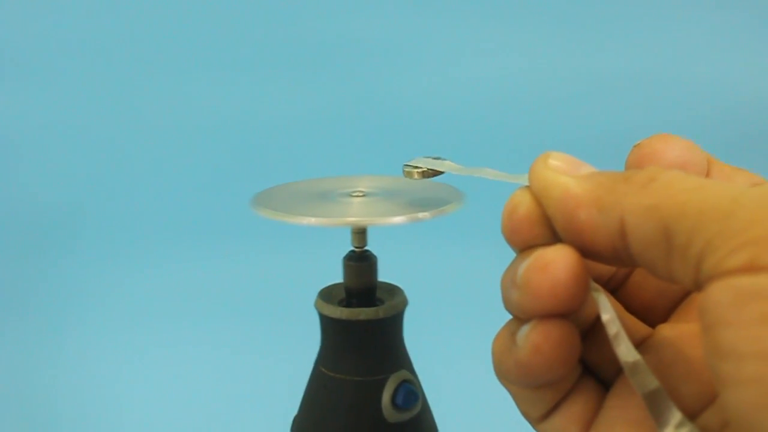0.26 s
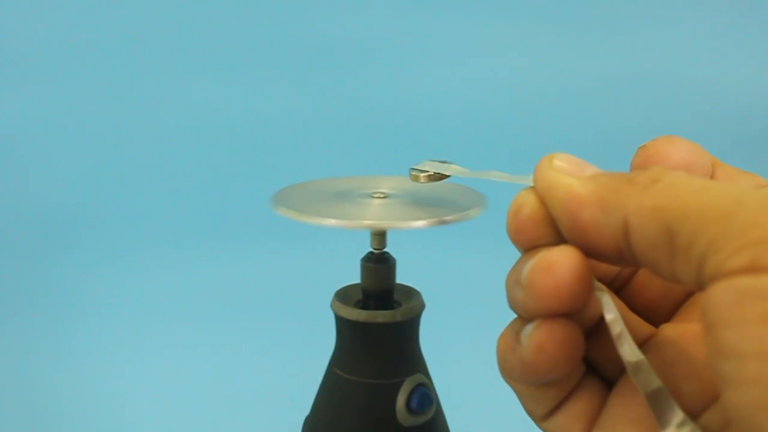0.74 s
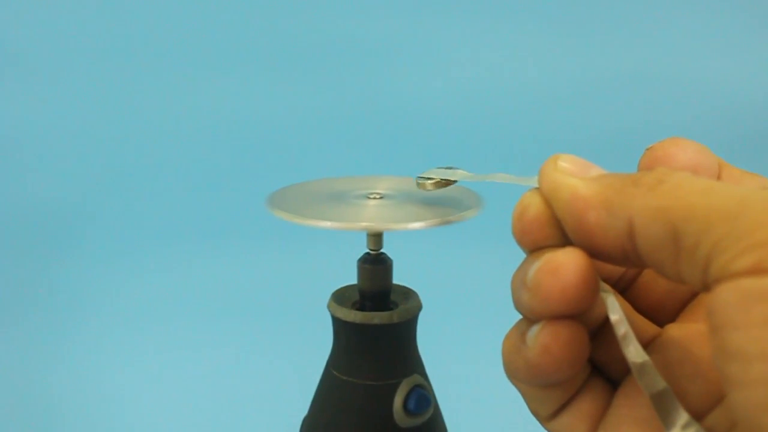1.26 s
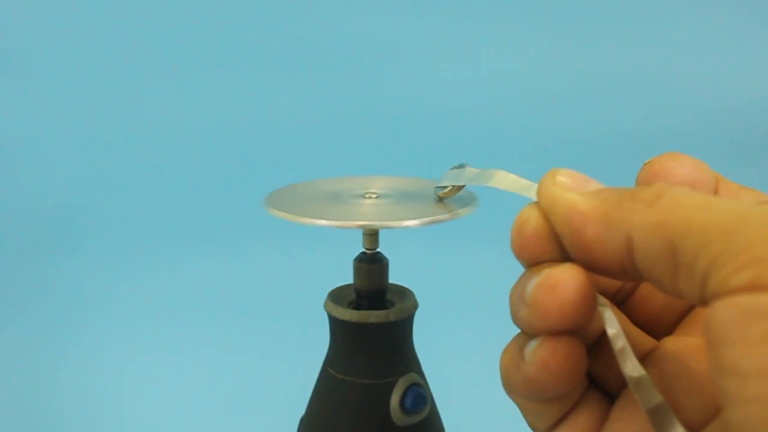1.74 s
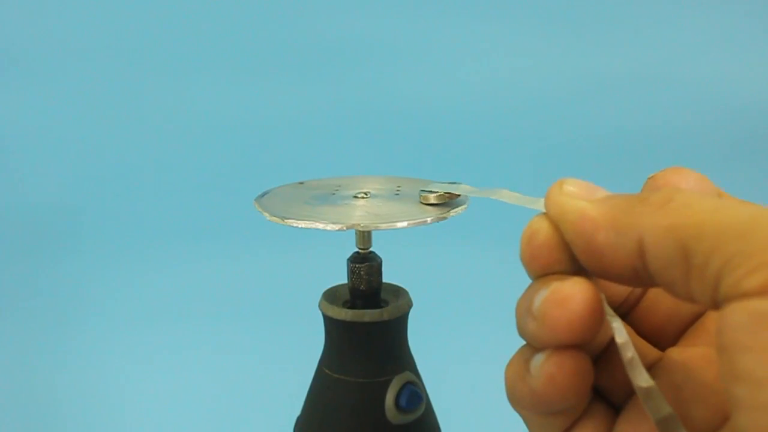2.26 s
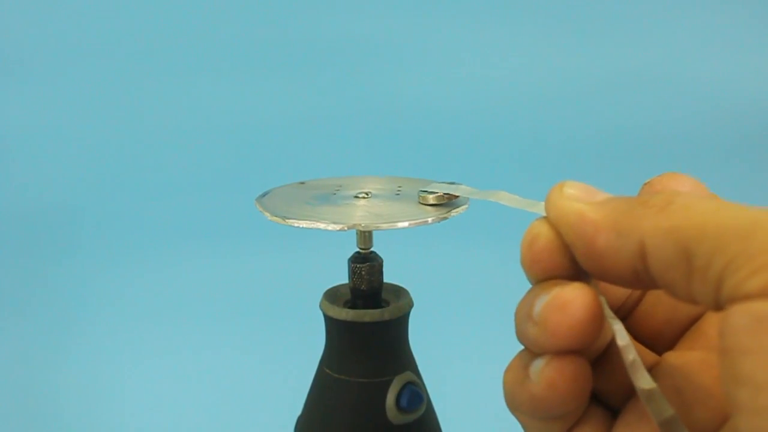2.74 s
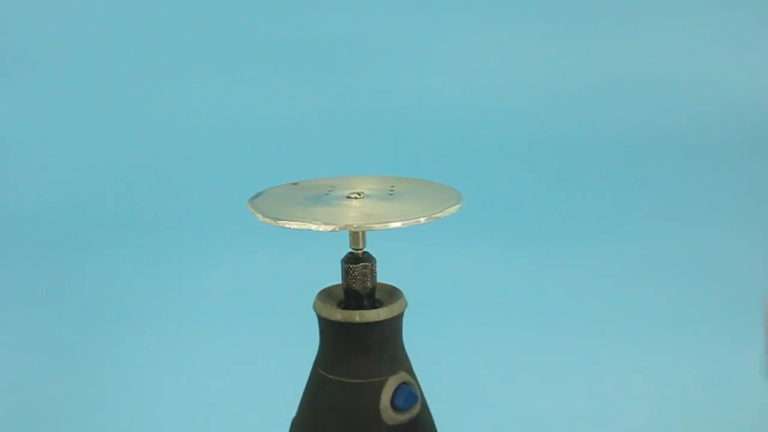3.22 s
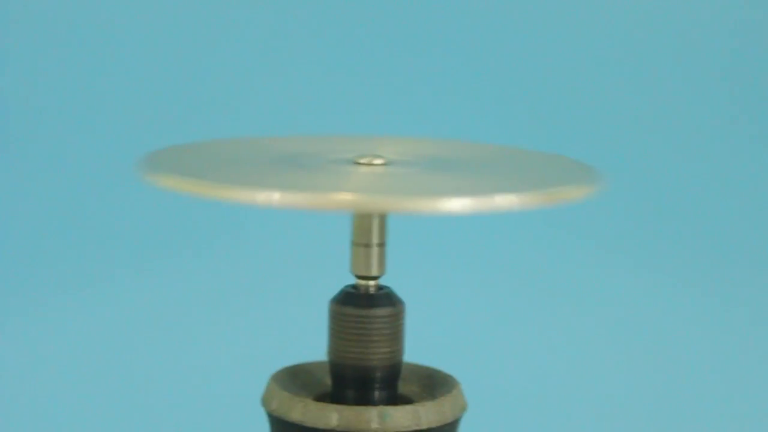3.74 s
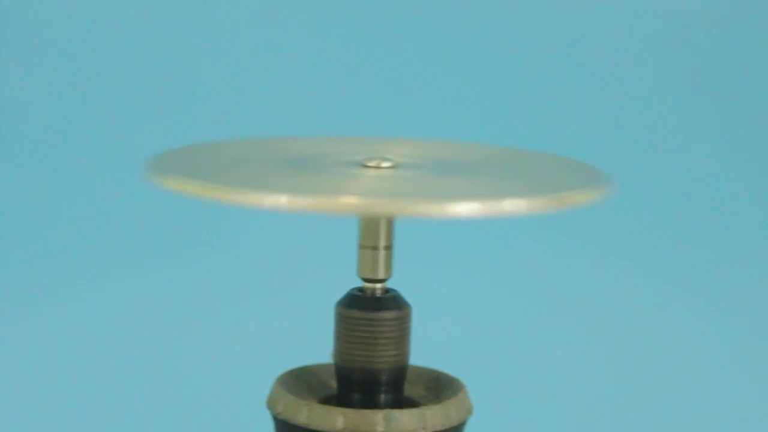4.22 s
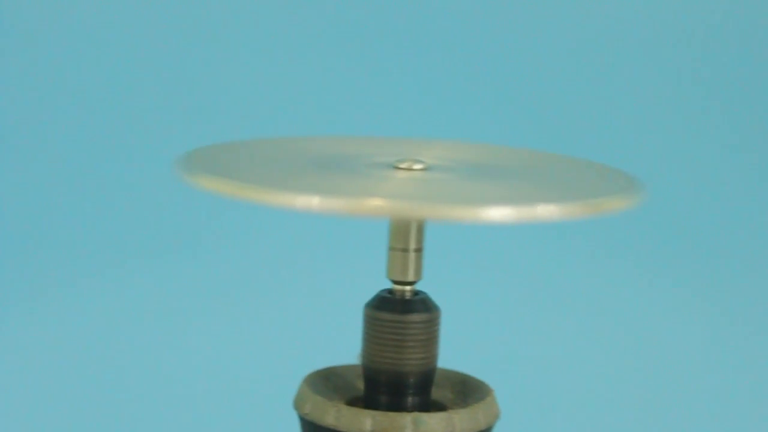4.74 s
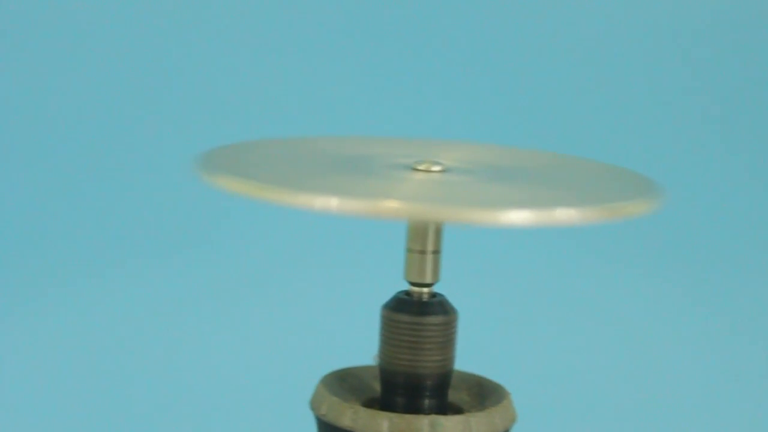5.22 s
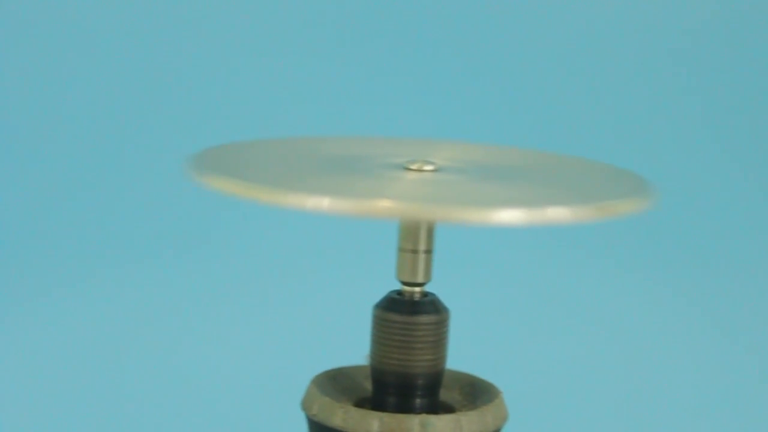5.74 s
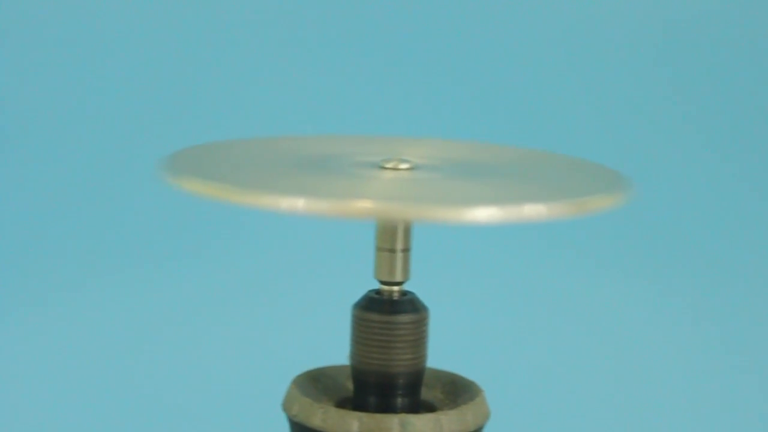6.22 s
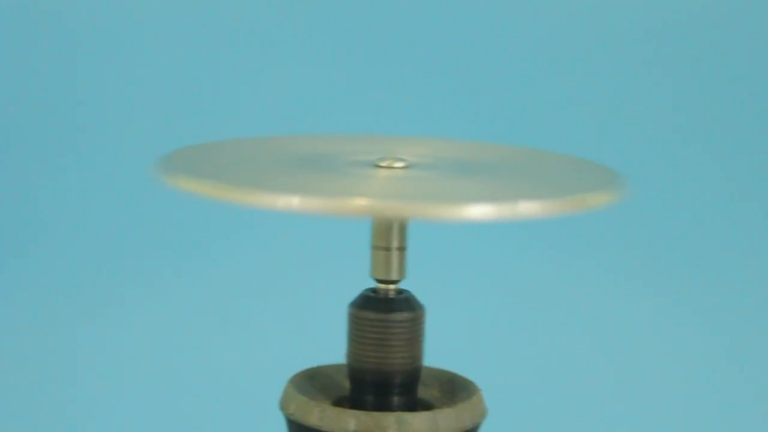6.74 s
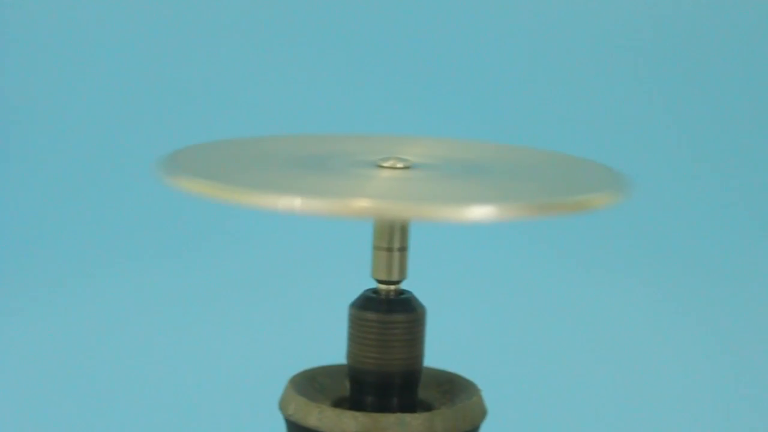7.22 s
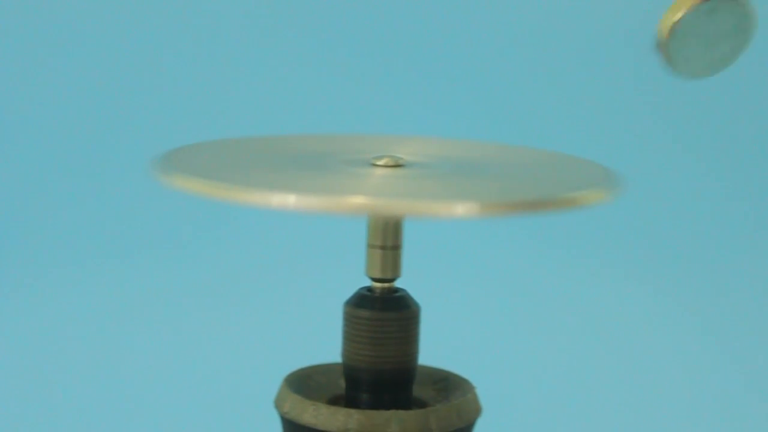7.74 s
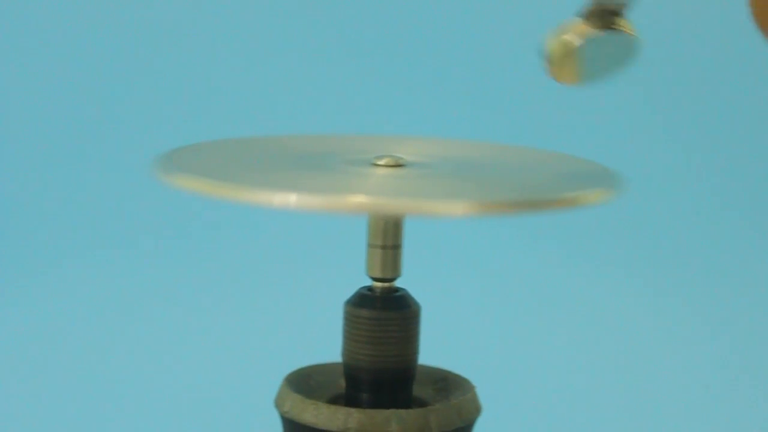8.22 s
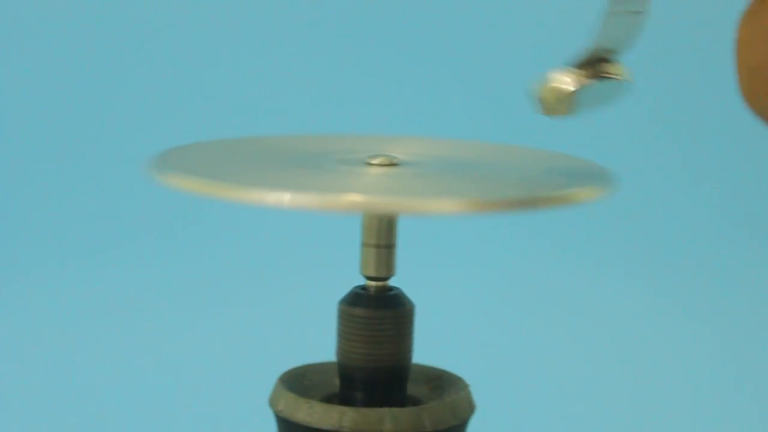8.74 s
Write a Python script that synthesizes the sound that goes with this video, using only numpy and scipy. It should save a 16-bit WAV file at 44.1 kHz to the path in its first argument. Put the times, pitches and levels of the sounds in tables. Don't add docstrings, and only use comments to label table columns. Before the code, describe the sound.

Close up in a quiet room, a small electric rotary tool hums and hisses, is switched off and glides down in pitch. A magnet clacks on the metal disc, skids and bounces with short ringing, then rests. After faint room hum it is pulled off with a light scrape. An abrupt cut brings back the motor, droning steadily to the end.

```python
import sys
import numpy as np
from scipy import signal
from scipy.fft import rfft, irfft
from scipy.io import wavfile
from scipy.ndimage import uniform_filter1d, map_coordinates

SR = 44100
rng = np.random.default_rng(int(sys.argv[2]) if len(sys.argv) > 2 else 0)


def log_audio(samples):
    frames = np.atleast_2d(samples).T
    limited = np.clip(frames, -1, 1)
    pcm = np.round(limited * 32767).astype(np.int16)
    wavfile.write(sys.argv[1], SR, pcm)


def amplitude_ratio(level_db):
    exponent = np.asarray(level_db, float) / 20
    return 10 ** exponent


N = 395577
T = np.arange(N) / SR
OFF_S, STOP_S, CHANGE_S = .52, 1.5, 3.4815
FIRST, SECOND = T < STOP_S, T > CHANGE_S
RIPPLE_HZ = 120
RUN_HZ = 186.2


def curve(table, outside=-120.):
    s, *columns = np.transpose(table)
    return [np.interp(T, s, c, left=outside, right=outside) for c in columns]


def unit(x):
    return x / np.sqrt(np.mean(x ** 2))


def colour(x, points, lo_hz=0.74, hi_hz=SR / 2):
    f = np.arange(1, N // 2 + 2) * SR / N
    hz, db = np.transpose(points)
    edges = 1 / np.sqrt((1 + (lo_hz / f) ** 8) * (1 + (f / hi_hz) ** 8))
    shape = amplitude_ratio(np.interp(np.log(f), np.log(hz), db))
    return unit(irfft(rfft(x) * shape * edges, N))


def walk(rate):
    knots = rng.standard_normal(400)
    return np.interp(T * rate, np.arange(len(knots)), knots)


def swell(s, length, rise_db_s, fall_db_s):
    return amplitude_ratio(-rise_db_s * np.maximum(s - T, 0) - fall_db_s * np.maximum(T - s - length, 0))


def whistle(s, length, hz, db):
    phase = np.cumsum(hz * (1 + 0.00404 * walk(30))) / SR
    gain = swell(s, length, 250, 400) * amplitude_ratio(db + 2.5 * walk(35))
    return np.sqrt(2) * gain * np.sin(2 * np.pi * phase)


def body(hz, modes):
    return np.sqrt(1 + sum(amplitude_ratio(2 * db) / (1 + (2 * (hz - f) / width) ** 2) for f, width, db in modes))


def peaks(hz, modes):
    return np.sqrt(sum(amplitude_ratio(2 * db) / (1 + (2 * (hz - f) / width) ** 2) ** 2 for f, width, db in modes))


def walls(hz, spread_db):
    return amplitude_ratio(spread_db * np.interp(hz / 45, np.arange(500), rng.standard_normal(500)))


# (frequency [Hz], level [dB per Hz])
ROOM_TONE = [(76, -24), (130, -13.5), (234, -21.5), (311, -9.5), (351, -15), (388, -22), (421, -15),
             (559, -19), (1210, -20), (1310, -21), (11900, -49), (16500, -72)]
# (time [s], length [s], frequency [Hz], level [dB])
FAR_WHISTLES = [(2.68, .13, 6960, -64), (2.84, .05, 6977, -63), (3.25, .23, 6960, -57),
                (2.58, .13, 9850, -66), (3.1, .38, 8600, -68)]


def room():
    hum = amplitude_ratio(-50 + 1.0 * walk(6.14)) * colour(rng.standard_normal(N), ROOM_TONE)
    return hum + sum(whistle(*row) for row in FAR_WHISTLES)


# (time [s], length [s], deep level [dB], upper level [dB])
TABLE_SHUDDERS = [
    (0, .05, -62, -60),
    (1.494, .02, -62, -51),
    (2.503, 0.83, -59.5, -64.5),
    (3.49, 0.46, -64, -50.5),
    (4.25, .2, -57, -49),
    (7.153, 0.57, -58, -45),
    (8.12, 0.071, -50, -52),
    (8.4, .57, -66, -66),
]


def table():
    deep = colour(rng.standard_normal(N), [(30, -25), (45, 7.0), (55, 8), (65, -11), (100, -29.5)])
    upper = colour(rng.standard_normal(N), [(50, -30), (75, 9), (90, -6), (106, 10.5), (125, -13), (200, -30)])
    steady = np.where(SECOND, 1, amplitude_ratio(-8.5)) * (amplitude_ratio(-61.5) * deep + amplitude_ratio(-52) * upper)
    return steady + sum(swell(s, length, 100, 69) * (amplitude_ratio(deep_db) * deep + amplitude_ratio(upper_db) * upper)
                        for s, length, deep_db, upper_db in TABLE_SHUDDERS)


# (frequency [Hz], level [dB], t60 [s])
DISC_MODES = [(1744, -4, .5), (2300, -10, .04), (3490, -18, .05), (5335, -13, .6), (5432, -8, .9),
              (5507, -13, .4), (8872, 0, .35), (8979, -6, .3), (9249, -10, .3), (9345, -9, .5),
              (9458, -6, .35), (10450, -14, .25), (10680, -6, .35), (10760, -9, .3), (11800, -15, .2),
              (12800, -22, .06), (14170, -11, .25), (14310, -10, .3), (14480, -12, .3), (15460, -15, .2),
              (15700, -17, .2)]


def ring(force, modes=DISC_MODES, damping=0.9):
    out = 0
    for hz, db, t60 in modes:
        pole = np.exp(2j * np.pi * hz / SR - np.log(1000) * damping / (t60 * SR))
        out = out + amplitude_ratio(db) * signal.lfilter([1], [1, -pole], force).imag
    return out


# (frequency [Hz], level [dB], t60 [s])
FREE_MODES = [(1744, -4, .5), (5432, -6, 1.1), (9345, -8, .5), (14310, -6, .3)]


def damped_disc(drive):
    out = np.zeros(N)
    resting = slice(SR, int(2.7 * SR))
    freed = slice(int(2.7 * SR), int(CHANGE_S * SR))
    force = drive[resting]
    out[resting] += amplitude_ratio(-12) * ring(force, damping=3.9) + amplitude_ratio(4) * ring(force, damping=4.2)
    out[resting] += amplitude_ratio(-5) * ring(force, FREE_MODES[:1], damping=.9)
    out[resting] += amplitude_ratio(-20) * ring(force, FREE_MODES[1:], damping=1.5)
    out[freed] += amplitude_ratio(-5) * ring(drive[freed], FREE_MODES) + ring(drive[freed], damping=4.)
    return out


# (time [s], length [s], ring level [dB], grit level [dB], release [dB/s])
MAGNET_SKIDS = [
    (1.4985, .003, -8, -50, 1600),
    (1.522, .32, -24, -47, 500),
    (1.8, .07, -41, -62, 85),
    (1.57, .008, -18, -42, 900),
    (1.6, .012, -16, -46, 700),
    (1.635, .015, -20, -55, 900),
    (1.752, .012, -21, -46, 500),
    (2.875, .02, -46, -58, 300),
    (2.893, .03, -35, -50, 300),
    (2.925, .035, -28.5, -44, 450),
]
# (time [s], peak level [dB], ring share [dB])
MAGNET_TAPS = [
    (0.7332, -11.5, -3.5),
    (1.4978, 0, -5),
    (1.523, -18, -12),
    (1.5429, -22, 9),
    (1.5686, -14, 5),
    (1.5955, -13, -2),
    (1.6013, -14, 7.5),
    (2.938, -19, 6),
    (2.9517, -22, -6),
]


def magnet():
    rub, scratch = sum(swell(s, length, 15000, fall) * amplitude_ratio([[ring_db], [grit_db]])
                       for s, length, ring_db, grit_db, fall in MAGNET_SKIDS)
    grit = rng.standard_normal(N) * amplitude_ratio(2.5 * rng.exponential(size=N)) * amplitude_ratio(1.5 * walk(45))
    grit = colour(grit, [(500, -62), (1500, -7.0), (3000, 6), (7000, -6.0), (12000, 11), (16000, 4.5)])
    blows, crack = np.zeros(N), np.zeros(N)
    decay = np.exp(-np.arange(512) / SR / 0.0015)
    for s, db, ring_share_db in MAGNET_TAPS:
        i = int(s * SR)
        blows[i] = amplitude_ratio(db + ring_share_db - 25.5)
        noise = rng.standard_normal(512)
        crack[i:i + 512] += amplitude_ratio(db - 18) * (noise - uniform_filter1d(noise, size=12)) * decay
    close = crack + amplitude_ratio(3.5) * scratch * grit + damped_disc(blows + amplitude_ratio(-37.0) * rub * grit)
    s = np.arange(SR // 2) / SR
    tail = rng.standard_normal(SR // 2) * np.exp(-np.log(1000) * s / 0.39)
    return close + amplitude_ratio(-39) * signal.fftconvolve(close, tail)[:N]


# (time [s], speed [turns/s])
WARMING_SPEED = [(3.48, 168.28), (3.95, 169.84), (4.5, 171.04), (5.2, 171.79), (6.0, 172.55), (6.6, 173.4),
                 (7.2, 173.87), (8.0, 174.86), (8.5, 174.8), (8.97, 173.82)]


def spin():
    since = np.maximum(T - OFF_S, 0)
    jolt = 8 * (1 - np.exp(-since / .15))
    coast_hz = RUN_HZ - 137 * since - jolt
    eddy_brake = 155 * np.maximum(T - 1.15, 0) ** 2
    disc_hz = RUN_HZ * np.exp(-since / 1.03) - eddy_brake
    speed_hz = np.where(FIRST, coast_hz, curve(WARMING_SPEED, outside=0)[0])
    return speed_hz, np.where(FIRST, disc_hz, speed_hz)


# (time [s], level [dB])
GRIP_WOBBLE = [(0, -19.5), (.5, -18.5), (3.49, -22.5), (3.99, -17.5), (5.75, -17), (5.98, -18.5),
               (8.97, -19.5)]
# (frequency [Hz], width [Hz], level [dB])
CRITICAL_SPEEDS = [(180.4, 14, -19), (165, 3.2, -23), (153.4, 8.4, -16), (135.7, 2.9, -26), (124.6, 9, -30),
                   (106.3, 10, -25), (93.7, 4.1, -27), (65, 45, -45.5)]


def disc_wobble(disc_hz, powered):
    return powered * amplitude_ratio(curve(GRIP_WOBBLE)[0]) + (1 - powered) * FIRST * peaks(disc_hz, CRITICAL_SPEEDS)


# (order, level in first run [dB], level in second run [dB], drift [dB/s])
SHAFT_ORDERS = [(2, -53, -42, 0), (3, -44, -31.5, -.3), (4, -47, -48, 1.8), (5, -48, -43, 0),
                (7, -54, -45, 2.2), (8, -37, -44, .5), (16, -33, -40, -.5), (18, -24.5, -32, 0),
                (20, -44, -45, 1), (22, -46, -44, -2.2), (24, -48, -47, 2), (32, -45, -37.5, -.6),
                (40, -37, -43, 0), (41, -42, -44, 2), (48, -37, -45, 0), (49, -38, -46, 0),
                (52, -45, -43, 0), (53, -40, -38.5, 2), (55, -41, -42, 0), (56, -45, -47, -1.8),
                (58, -56, -44, 0), (59, -55, -43, 0), (60, -47, -45, 0), (64, -45, -46, 0),
                (67, -46, -47, 0), (72, -48, -43, 0), (80, -57, -39.5, 0)]
# (order, ripple, level in first run [dB], level in second run [dB], drift [dB/s])
RIPPLE_BEATS = [(0, 2, -46, -46, 0), (1, 1, -33, -28.3, -1.2), (1, 2, -46, -45, 0), (2, 3, -42, -55, 0),
                (8, -1, -41, -51, .7), (8, 1, -47, -42, 0), (16, -2, -47, -33, .3),
                (16, -1, -48, -43, -2.2), (16, 1, -51, -46, -2.7), (47, 1, -37, -54, 0),
                (49, -2, -39, -59, 0)]
# (frequency [Hz], width [Hz], depth [dB])
ROOM_NULLS = [(505, 5, 6), (517.5, 5, 11), (2556, 10, 9), (3132, 9, 13), (5488, 12, 8), (5508, 12, -4),
              (5530, 14, 9), (5570, 20, 9), (10140, 110, -10)]
COAST_ORDERS = {16: -3, 18: 1, 20: -5, 22: -1, 24: 2, 32: 2, 40: -3, 48: 0, 56: 2, 64: 1, 72: -1, 80: -1}
# (frequency [Hz], width [Hz], level [dB])
HOUSING_PEAKS = [(2300, 700, -46), (3100, 900, -38), (4700, 1300, -42), (7000, 3000, -43), (8800, 700, -39),
                 (12000, 5000, -45)]
# (frequency [Hz], width [Hz], level [dB])
STAND_PEAKS = [(154, 29, -24.5), (196, 25, -29.5), (264, 42, -32), (315, 35, -29), (371, 25, -36),
               (408, 20, -29.5), (462, 48, -34.5), (610, 40, -43)]


def shaft_tones(speed_hz, disc_hz, turns, disc, powered, octaves):
    out = np.zeros(N)
    coast = slice(int(OFF_S * SR), int(STOP_S * SR))
    unpowered, fall = 1 - powered[coast], octaves[coast]
    for order, beat, first_db, second_db, drift in [(k, 0, *db) for k, *db in SHAFT_ORDERS] + RIPPLE_BEATS:
        low = order < 6
        hz = order * (disc_hz if low else speed_hz) + beat * RIPPLE_HZ
        null_db = sum(depth / (1 + (2 * (hz - f) / width) ** 2) for f, width, depth in ROOM_NULLS)
        level_db = np.where(FIRST, first_db, second_db + drift * (T - 6) - null_db)
        gain = powered * amplitude_ratio(level_db + (.8 if low else 1.5) * walk(2.5))
        if beat == 0 and order in COAST_ORDERS:
            slot_gain = amplitude_ratio(COAST_ORDERS[order] + .22 * order * fall)
            gain[coast] += unpowered * peaks(hz[coast], HOUSING_PEAKS) * walls(hz[coast] / 4, 4.5) * slot_gain
        if beat == 0 and low:
            overtone_gain = amplitude_ratio(-2.5 * abs(order - 2.5) + 9 * fall)
            gain[coast] += unpowered * peaks(hz[coast], STAND_PEAKS) * overtone_gain
        cycles = order * (disc if low else turns) + beat * RIPPLE_HZ * T + rng.random()
        out += np.sqrt(2) * gain * np.sin(2 * np.pi * cycles)
    return out


def commutator(speed_hz, turns):
    s, order = np.arange(0, 9.2, .1), np.arange(1025)
    knots = rng.standard_normal((12, 1025, 2)) @ [1, 1j] * amplitude_ratio(2.5 * rng.standard_normal(1025))
    knots[2:, [1] + [row[0] for row in SHAFT_ORDERS]] = 0
    knots[:2] *= ~np.isin(order, list(COAST_ORDERS))
    knots *= np.clip(order / 30, 0, 1)
    k, part = (s * 1.1).astype(int), (s * 1.1 % 1)[:, None]
    speed = np.maximum(speed_hz[np.minimum(s * SR, N - 1).astype(int)], 60)[:, None]
    blend = knots[k] * (1 - part) + knots[k + 1] * part
    shapes = irfft(blend * (order * speed < 17000) * np.sqrt(speed))
    return unit(map_coordinates(shapes, [T * 10, turns % 1 * 2047], order=1))


# (frequency [Hz], level [dB per Hz])
BRUSH_COLOUR = [(60, -35), (300, -7), (500, -9.5), (700, -3.5), (1500, -4.5), (2200, -6), (3000, -3),
                (5000, -7.5), (7000, -5.5), (10000, -0.5), (13000, -6.5), (15500, -9), (17000, -8)]
# (frequency [Hz], width [Hz], level [dB])
FIRST_STANCE = [(190, 15, 16), (307, 11, 14), (463, 21, 10), (460, 43, 8), (640, 20, -19), (1000, 80, 1),
                (1690, 250, 5), (3470, 360, -1), (4100, 210, -3), (7000, 340, 5.5), (7780, 270, 1),
                (9030, 74, 15.5), (10000, 160, 0), (11500, 400, -0.5)]
SECOND_STANCE = [(1490, 51, 1.1), (1900, 440, 3.3), (2576, 42, 1.3), (3434, 67, 0.58), (5940, 16, 1.5),
                 (7320, 230, 4), (9100, 64, 2), (10060, 18, 12), (12500, 66, 1.7), (13330, 84, 4.1),
                 (13800, 180, 4)]


def brushes(speed_hz, turns, powered, octaves, wobble):
    settle_db = np.where(FIRST, 0, 3 * np.exp(-np.abs(T - CHANGE_S) / 0.32))
    level_db = -26 + 7.5 * octaves + settle_db
    running = FIRST | SECOND
    whirr = running * amplitude_ratio(level_db + 0.49 * walk(3.5))
    hiss = running * amplitude_ratio(level_db + 0.2 * walk(9.2)) * (1 + 0.19 * wobble / amplitude_ratio(-20.5))
    noise = rng.standard_normal(N) * (1 + 0.064 * np.cos(2 * np.pi * turns))
    source = rfft(commutator(speed_hz, turns) * amplitude_ratio(np.where(powered > .5, -3, -1)) + noise)
    f = np.arange(len(source)) * SR / N
    stances = body(f, FIRST_STANCE) * walls(f, spread_db=3.), body(f, SECOND_STANCE)
    source = np.where(FIRST, *(unit(irfft(source * gain, N)) for gain in stances))
    ripple = 2 * np.pi * RIPPLE_HZ * T
    throb = powered * (np.cos(ripple) + 0.14 * np.cos(2 * ripple))
    low = amplitude_ratio(-3) * whirr * (1 + 0.2 * throb) * colour(source, BRUSH_COLOUR, lo_hz=150., hi_hz=4420.0)
    return low + amplitude_ratio(-3.5) * hiss * (1 + .08 * throb) * colour(source, BRUSH_COLOUR, lo_hz=5000.)


# (time [s], length [s], frequency [Hz], level [dB])
SETTLING_FLARES = [(3.49, .19, 2590, -33), (3.49, .13, 4387, -39)]


def tool():
    speed_hz, disc_hz = spin()
    turns, disc = np.cumsum(speed_hz) / SR, np.cumsum(disc_hz) / SR
    powered = np.where(FIRST, np.clip((OFF_S - T) / 0.023 + 1, 0, 1), SECOND)
    octaves = np.log2(np.where(FIRST, speed_hz / RUN_HZ, 1))
    wobble = disc_wobble(disc_hz, powered)
    out = np.sqrt(2) * wobble * np.sin(2 * np.pi * disc)
    out += SECOND * sum(whistle(*row) for row in SETTLING_FLARES)
    out += shaft_tones(speed_hz, disc_hz, turns, disc, powered, octaves)
    return out + brushes(speed_hz, turns, powered, octaves, wobble)


def scene():
    return np.tile(room() + table() + magnet() + tool(), (2, 1))


def band_limit(x):
    return signal.sosfilt(signal.butter(12, 16840, fs=SR, output="sos"), x)


def record(dry):
    steep = signal.ellip(10, .2, 60, 15800, fs=SR, output="sos")
    mix = signal.sosfilt(steep, dry)
    return band_limit(mix)


dry = scene()
out = record(dry)
log_audio(out)
```